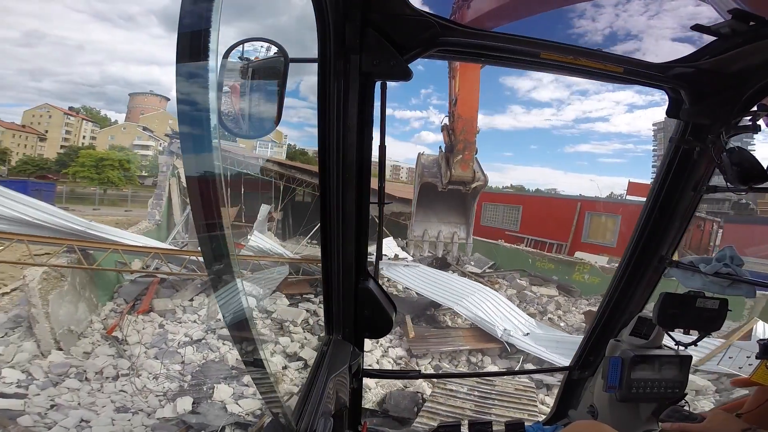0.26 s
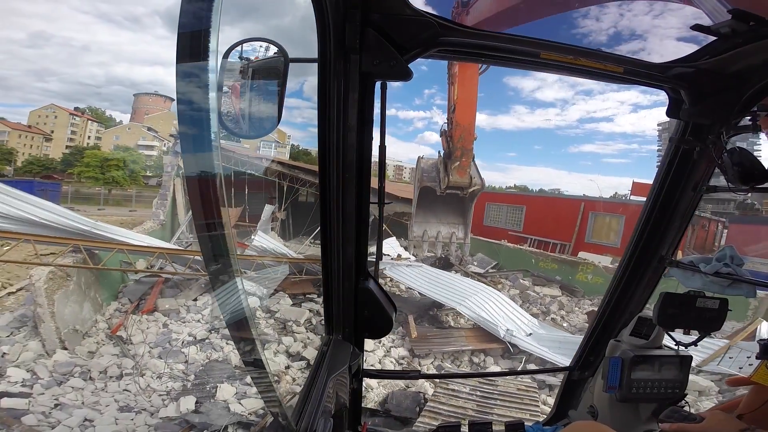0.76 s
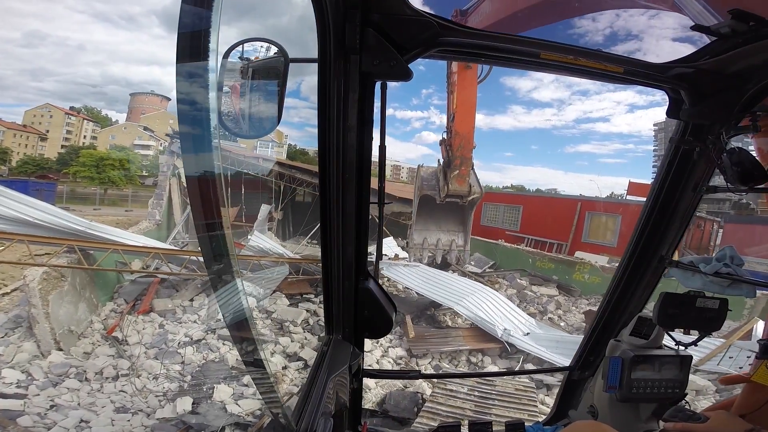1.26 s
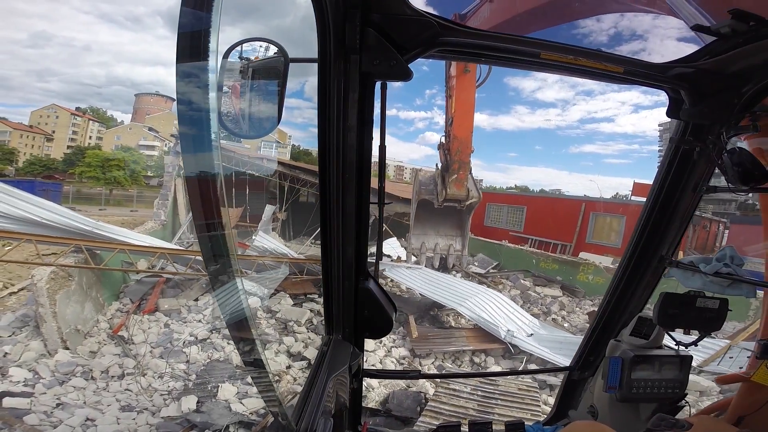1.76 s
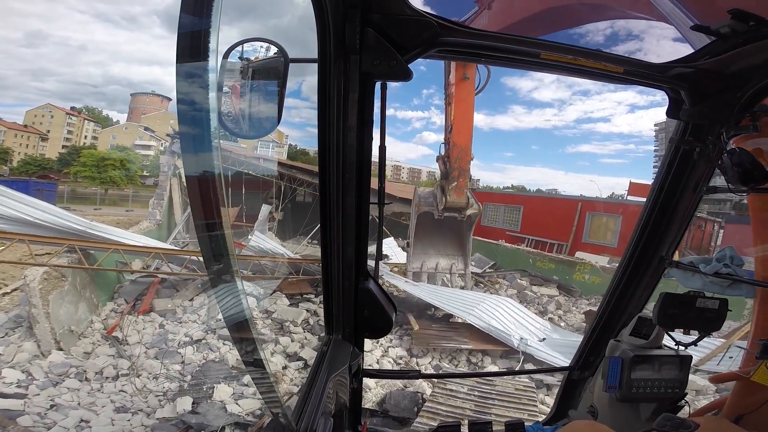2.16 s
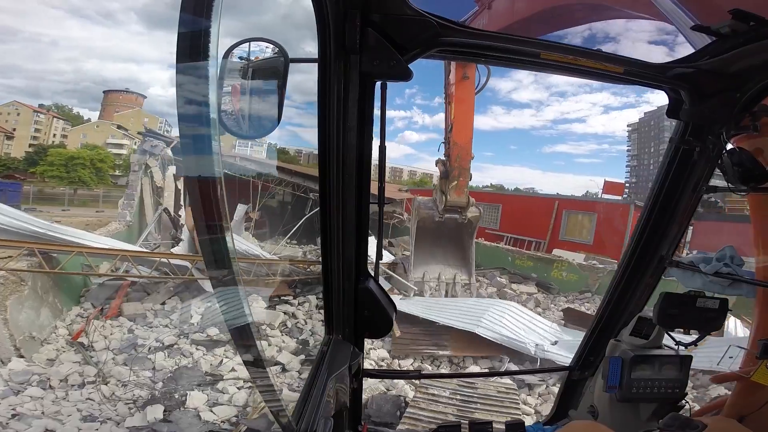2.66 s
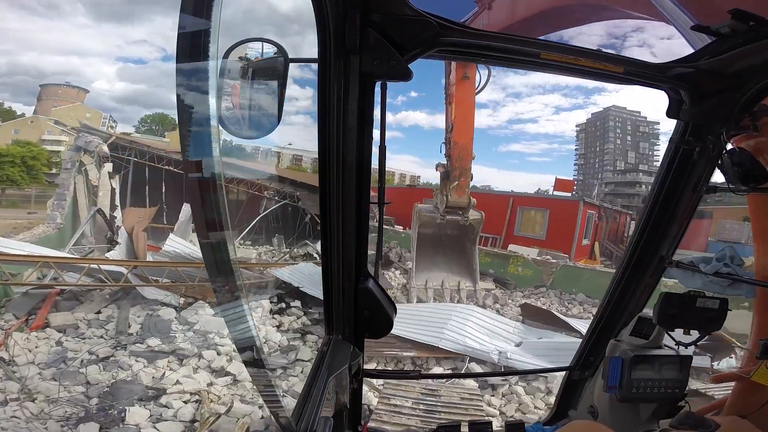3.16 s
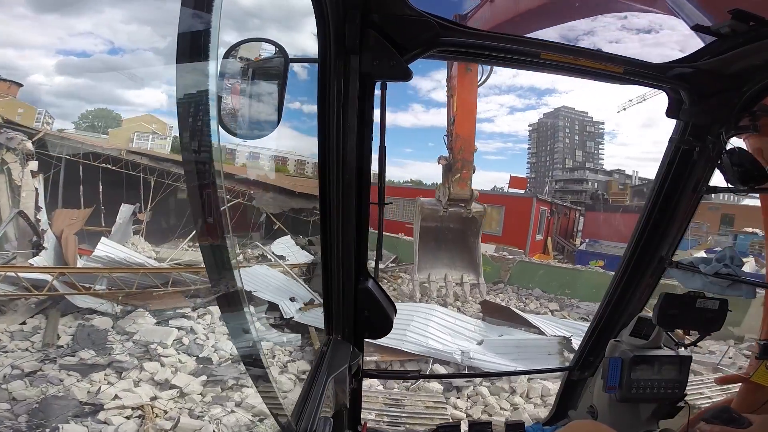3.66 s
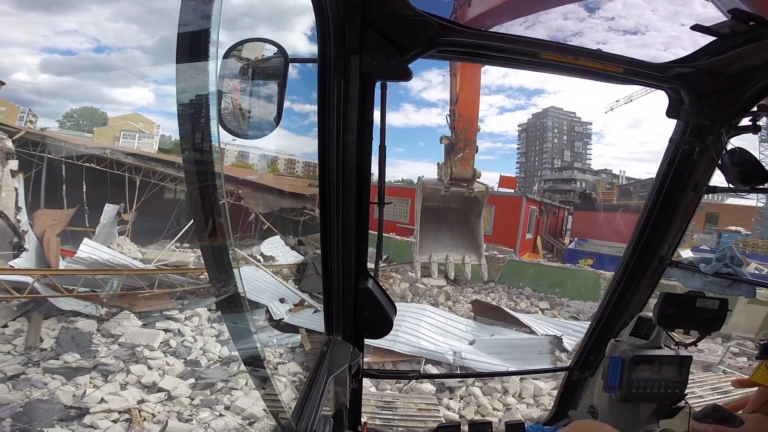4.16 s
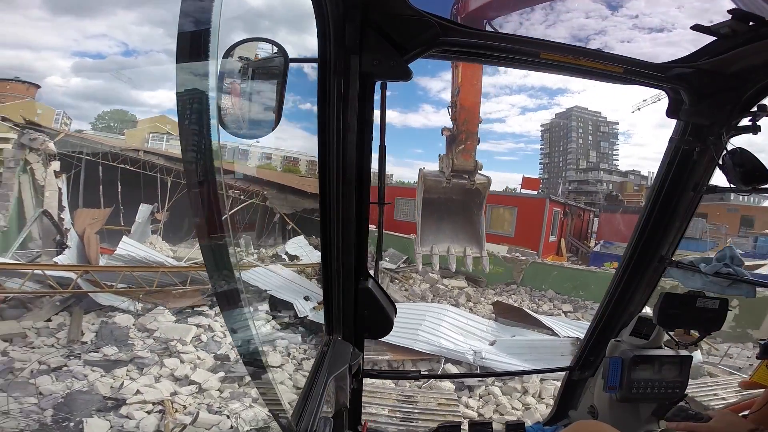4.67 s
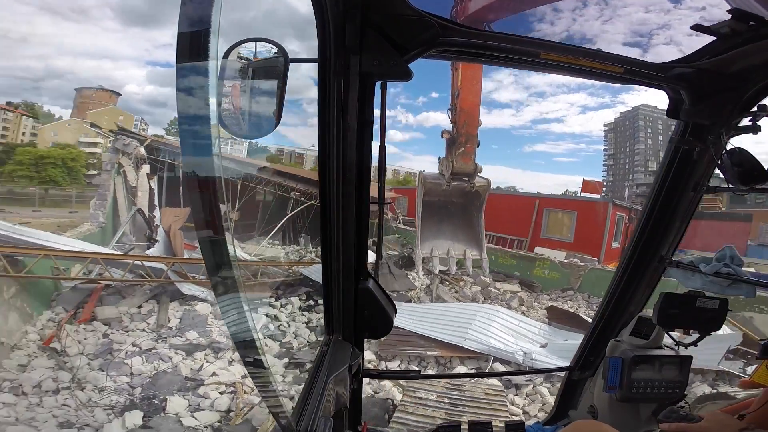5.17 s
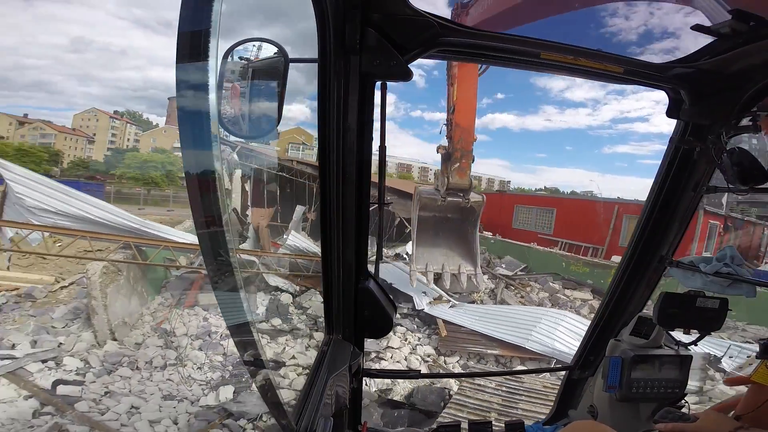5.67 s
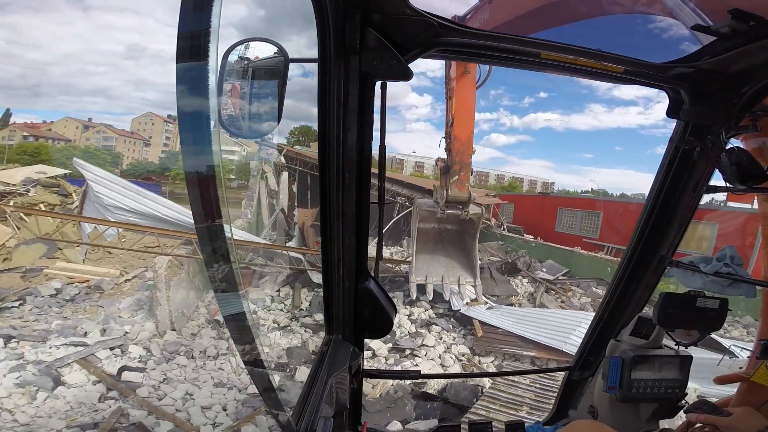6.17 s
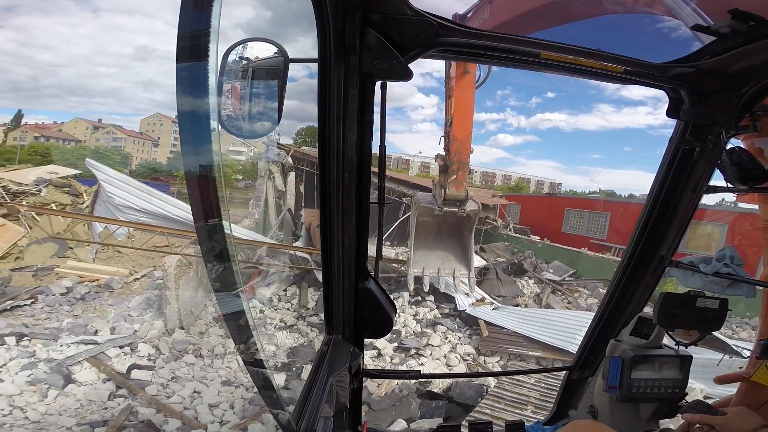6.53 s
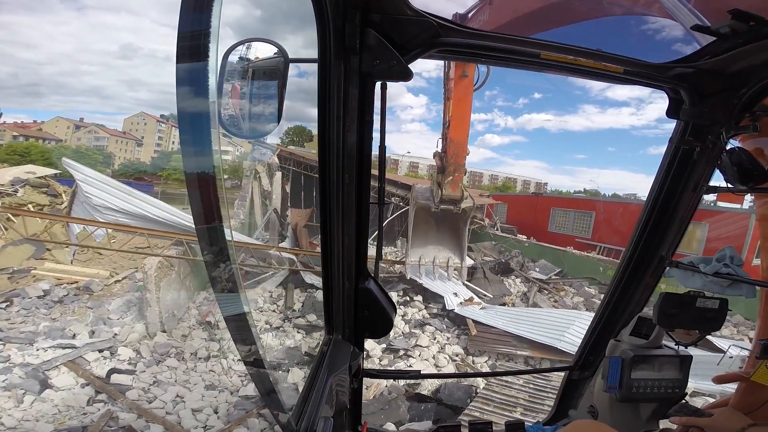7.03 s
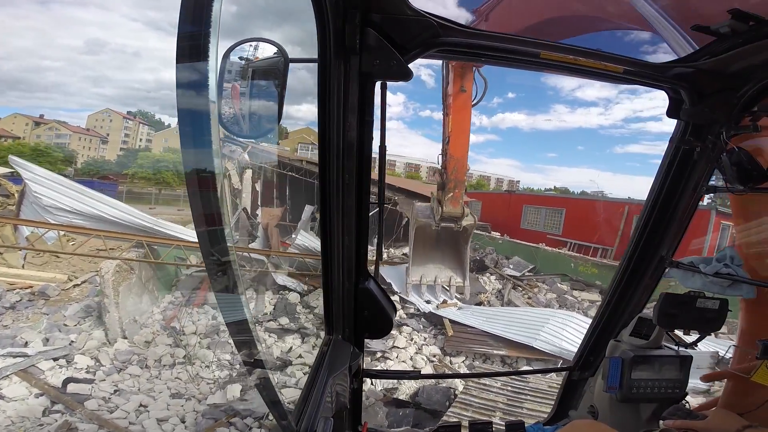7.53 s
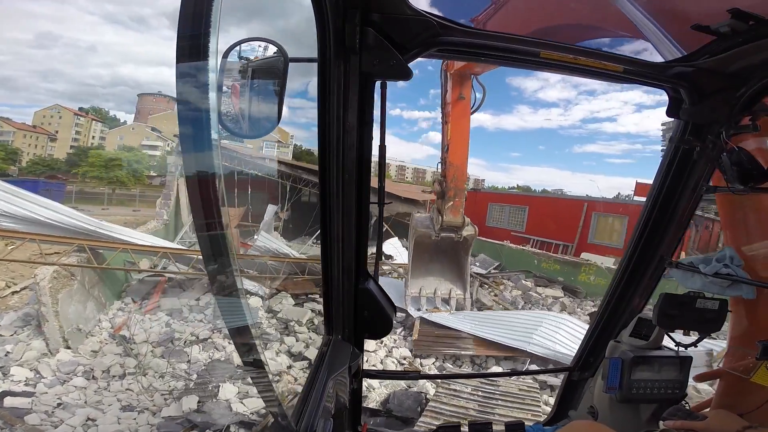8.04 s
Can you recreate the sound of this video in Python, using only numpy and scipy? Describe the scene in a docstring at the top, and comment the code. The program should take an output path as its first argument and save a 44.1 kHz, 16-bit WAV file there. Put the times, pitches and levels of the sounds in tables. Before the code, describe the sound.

A bass-heavy diesel drone fills a small glass-walled cab, its boom constantly rising and falling, with a steady pump hum. A microphone inside catches muffled bucket thuds, dry steel clanks, rattling panels and tiny grit ticks. Valves spit, rush and whistle faintly as the arm sweeps rubble. The hardest clank comes early, drumming thuds follow mid-way, then a short gritty scrape of sheet metal and more knocks near the end.

```python
"""Inside the closed cab of a diesel excavator that sweeps sheet metal.
From the start engine orders boom, a pump hums, jolts shake the cab; oil and fan noise hiss, valves whistle,
grit ticks. From 0.27 s the bucket knocks: steel modes clank, thuds come dulled through rubber mounts.
Near 1.55 s a tink leads the hardest clank, with gritty noise bursts at its onset and a drumming panel;
from 1.76 s valves spit noise. Near 6.94 s a gritty burst opens the scrape of the teeth, which rings the sheet."""
import sys
import numpy as np
from scipy import signal
from scipy.fft import rfft, irfft
from scipy.io import wavfile
from scipy.ndimage import uniform_filter1d, minimum_filter1d

SR = 44100
rng = np.random.default_rng(int(sys.argv[2]) if len(sys.argv) > 2 else 0)


def dump(signal):
    """Clip the signal to [-1, 1] and save it as 16-bit WAV at the path in sys.argv[1]."""
    limited = np.clip(np.atleast_2d(signal).T, -1, 1)
    pcm = np.round(limited * 32767).astype(np.int16)
    wavfile.write(sys.argv[1], SR, pcm)


N = 366030
TIME = np.arange(N) / SR


def amp(db):
    """Amplitude of a level in dB."""
    return 10 ** (np.asarray(db) / 20)


def unit(x):
    """Scales to rms 1."""
    return x / np.sqrt(np.mean(x ** 2) + 1e-20)


def noise():
    """White noise over the whole scene."""
    return rng.standard_normal(N)


def curves(rows):
    """Each column of a table, interpolated over time."""
    start_s, *columns = np.transpose(rows)
    return [np.interp(TIME, start_s, column) for column in columns]


def colour(x, points, peaks=()):
    """Filters by a smooth spectrum with narrow resonances on top; rms 1."""
    hz = np.fft.rfftfreq(N, 1 / SR)
    point_hz, point_db = np.transpose(points)
    shape_db = np.interp(np.log(hz + 1), np.log(point_hz), point_db)
    # steep skirts outside the listed range
    shape_db = shape_db - 40 * np.maximum(np.log(point_hz[0] / (hz + 1)), 0)
    shape_db = shape_db - 40 * np.maximum(np.log((hz + 1) / point_hz[-1]), 0)
    for centre_hz, width_hz, lift_db in peaks:
        shape_db = shape_db + lift_db / (1 + (2 * (hz - centre_hz) / width_hz) ** 2)
    return unit(irfft(rfft(x) * amp(shape_db), N))


def wander(rate_hz):
    """Random control of rms 1 that rolls off above the rate."""
    hz = np.fft.rfftfreq(N, 1 / SR)
    hz = hz[:np.searchsorted(hz, 2000)]
    chance = rng.standard_normal(len(hz)) + 1j * rng.standard_normal(len(hz))
    return unit(irfft(chance / (1 + (hz / rate_hz) ** 4), N))


def held(start_s, length_s, rise_s, fade_s):
    """Envelope that rises from the start, holds until the length is over and decays exponentially."""
    age_s = TIME - start_s
    return np.clip(age_s / rise_s, 0, 1) * np.exp(-np.maximum(age_s - length_s, 0) / fade_s)


def steadied(x, size):
    """Evens out swells that last longer than size samples."""
    power = uniform_filter1d(uniform_filter1d(x ** 2, size), size)
    return x / np.sqrt(power + 1e-6)


def add(mix, start_s, sound):
    """Mixes a sound in at its start time."""
    part = mix[max(round(start_s * SR), 0):][:len(sound)]
    part += sound[:len(part)]


def order_tone(turns, multiple, rough, waver_hz):
    """One order of a rotation, uneven in strength and timing; rms 1."""
    phase = 2 * np.pi * (multiple * turns + rng.random())
    in_phase = (1 + rough * wander(waver_hz)) * np.cos(phase)
    return unit(in_phase + rough * wander(waver_hz) * np.sin(phase))


def shifting(x, depth_db, width_hz, rate_hz):
    """Short-lived resonances come and go at random pitches; rms 1."""
    hz, t, z = signal.stft(x, SR, nperseg=512, noverlap=384)
    field = rng.standard_normal((len(t), len(hz))).T
    across = np.fft.fftfreq(len(hz), hz[1])[:, None]
    along = np.fft.fftfreq(len(t), t[1])
    smoothing = np.exp(-(across * width_hz) ** 2 - (along / rate_hz) ** 2)
    patches = unit(np.fft.ifft2(np.fft.fft2(field) * smoothing).real)
    shifted = signal.istft(z * amp(depth_db * patches), SR, nperseg=512, noverlap=384)[1]
    return unit(shifted[:N])


def ring(modes, clatter_s, tilt_db=0, spread=0.03, sag=0):
    """A noisy blow rings modes that start flat by the share sag and rise as the contact tightens.

    tilt_db is per octave; spread is each mode's random detuning; the loudest 10 ms have rms 1.
    """
    t = np.arange(SR // 2) / SR
    blow = rng.standard_normal(len(t)) * np.exp(-t / clatter_s)
    rise_s = 0.011
    stretched = t - sag * rise_s * (1 - np.exp(-t / rise_s))
    sound = np.zeros(len(t))
    for hz, level_db, t60_s in modes:
        detuned_hz = hz * (1 + spread * (2 * rng.random() - 1))
        swell = 1 - np.exp(-hz * t)  # a mode needs about a cycle to build up
        mode = np.sin(2 * np.pi * detuned_hz * stretched) * swell * amp(-60 * t / t60_s)
        rung = signal.fftconvolve(blow, mode)[:len(t)]
        sound += amp(level_db + tilt_db * np.log2(hz / modes[0][0])) * rung / abs(rung).max()
    return sound / np.sqrt(uniform_filter1d(sound ** 2, size=441).max())


# crankshaft speed: time_s, turns_per_s
CRANK_SPEED = [(0.0, 27.7), (0.95, 27.9), (1.3, 27.6), (1.6, 27.8), (2.7, 27.55), (3.3, 27.75), (4.0, 27.6),
               (4.75, 27.8), (5.4, 27.7), (6.55, 27.5), (7.6, 27.7), (8.29, 27.6)]


def crankshaft():
    """Turns made so far: the integral of the speed."""
    return np.cumsum(curves(CRANK_SPEED)[0]) / SR


# boom at the firing rate: time_s, level_db
FIRING_BOOM = [(0.0, -13.5), (0.14, -10), (0.24, -17.5), (0.44, -10.5), (0.72, -22), (0.88, -42),
               (1.02, -23.5), (1.14, -33), (1.24, -26.5), (1.4, -29.5), (1.62, -29.5), (1.95, -42),
               (2.1, -25.5), (2.62, -19.5), (2.68, -20.5), (2.75, -10.5), (2.92, -15.5), (3.05, -18.5),
               (3.28, -20.5), (3.62, -10.5), (3.74, -25.5), (3.94, -10), (4.18, -14.5), (4.31, -28),
               (4.4, -20), (4.86, -18), (4.98, -27), (5.06, -20.5), (5.22, -8), (5.4, -14.5), (5.66, -28.5),
               (5.82, -15.5), (5.94, -20), (6.03, -13.5), (6.15, -21.5), (6.36, -15), (6.46, -31.5),
               (6.57, -25), (6.68, -42), (6.76, -21.5), (6.83, -31), (6.9, -20.5), (7.08, -15.5),
               (7.72, -26), (7.82, -15), (8.06, -33), (8.16, -15), (8.29, -21.5)]
# hum at twice the firing rate: time_s, level_db
DOUBLE_FIRING = [(0.0, -32), (0.28, -29), (0.9, -31.5), (1.1, -29.5), (1.47, -39.5), (1.65, -31.5),
                 (1.9, -33), (2.8, -26.5), (3.4, -33), (4.45, -34.5), (5.2, -30.5), (5.9, -37),
                 (6.12, -26.5), (6.42, -35), (6.6, -32.5), (6.7, -38), (6.85, -27.5), (7.12, -26),
                 (8.29, -29)]
# weak engine orders: multiple_of_crank_speed, level_db
WEAK_ORDERS = [(1, -32.5), (3, -51.5), (3.5, -36), (5, -60), (8, -46.5), (8.5, -47.5), (12, -64.5),
               (16, -67.5)]
THROB_DB, THROB_HZ = 0.56, 15  # rms depth, corner rate


def engine(turns):
    """Two firings a turn boom in the cab, with twice that rate and weak orders of the crankshaft."""
    firing_db = curves(FIRING_BOOM)[0] + THROB_DB * wander(THROB_HZ)
    boom = amp(firing_db) * order_tone(turns, 2, rough=0.1, waver_hz=6)
    double = amp(curves(DOUBLE_FIRING)[0]) * order_tone(turns, 4, rough=0.34, waver_hz=6.2)
    weak = sum(amp(level_db) * order_tone(turns, multiple, rough=0.72, waver_hz=5.8)
               for multiple, level_db in WEAK_ORDERS)
    return boom + double + weak


# fundamental of the pump: time_s, level_db
PUMP_HUM = [(0.0, -38), (0.25, -32), (0.45, -35.5), (0.68, -30.5), (0.9, -42.5), (1.07, -49), (1.34, -38.5),
            (1.55, -41), (1.8, -47), (2.05, -39), (2.45, -33.5), (2.62, -34.5), (2.73, -53), (2.86, -36.5),
            (3.3, -38.5), (3.76, -42.5), (3.94, -53), (4.24, -50.5), (4.38, -34), (4.7, -33.5), (5.05, -33),
            (5.25, -28.5), (5.5, -32), (5.85, -40), (6.3, -54.5), (6.4, -41), (6.5, -32), (6.74, -42.5),
            (7.16, -34.5), (7.55, -42.5), (7.86, -44.5), (8.29, -36)]
# overtones of the pump: time_s, second_harmonic_db, third_harmonic_db
PUMP_HARMONICS = [(0.0, -61.5, -67), (0.6, -60, -61.5), (0.95, -56, -71), (1.5, -56, -70), (1.85, -66, -74),
                  (2.35, -63, -66), (2.9, -59.5, -59), (4.1, -64, -53.5), (4.5, -63.5, -62.5),
                  (6.25, -67, -70.5), (6.55, -59.5, -69), (7.1, -62.5, -60), (8.29, -67, -65.5)]


def pump(turns):
    """Seven piston strokes a turn hum, with two overtones."""
    strokes = 7
    hum = amp(curves(PUMP_HUM)[0]) * order_tone(turns, strokes, rough=0.15, waver_hz=7)
    overtones = sum(amp(level_db) * order_tone(turns, k * strokes, rough=1.0, waver_hz=6.4)
                    for k, level_db in enumerate(curves(PUMP_HARMONICS), 2))
    return hum + overtones


# jolts of the machine: start_s, length_s, floor_db, sway_db, panel_db
CAB_JOLTS = [(-.02, 0.16, -19, -29, -33), (0.19, 0.56, -31, -25, -41), (0.963, 0.067, -27, -21, -54),
             (1.543, 0.039, -36, -27, -38), (1.707, 0.07, -33, -23.5, -52), (2.027, 0.15, -21.5, -22, -36),
             (2.238, 0.43, -36.5, -21.5, -44.5), (2.722, 0.13, -21.5, -25, -33.5),
             (2.874, 0.13, -26.5, -32, -35), (3.114, 0.077, -23, -27.5, -36.5),
             (3.445, 0.082, -22.5, -15.5, -25.5), (3.546, 0.064, -15.5, -21, -32),
             (3.726, 0.09, -20.5, -18.5, -29.5), (4.423, 0.094, -30, -34, -40),
             (4.675, 0.27, -23, -30, -37.5), (5.008, 0.11, -12, -28.5, -31.5),
             (5.185, 0.22, -36.5, -34, -35), (5.513, 0.072, -17, -13.5, -29.5),
             (5.629, 0.078, -26, -16.5, -30.5), (5.76, 0.12, -22.5, -20.5, -33),
             (5.855, 0.14, -16.5, -16.5, -34), (6.078, .24, -23, -28.5, -36.5),
             (6.517, 0.059, -43, -29, -56), (6.83, 0.45, -31.5, -22.5, -42),
             (7.293, 0.15, -21, -25.5, -33.5), (7.512, 0.12, -19, -18.5, -35.5),
             (7.758, 0.23, -20, -19, -34), (8.04, 0.11, -25, -15.5, -36), (8.19, 0.12, -21.5, -12.5, -31)]
JOLT_RISE_S, JOLT_FADE_S = 0.024, 0.081
REST_FLOOR_DB, REST_SWAY_DB, REST_PANEL_DB = -43, -32, -45


def shaking():
    """Levels in dB of floor boom, slow sway and panel rattle: jolts add power to a steady trembling."""
    rest = amp([[REST_FLOOR_DB], [REST_SWAY_DB], [REST_PANEL_DB]])
    power = rest ** 2 * np.ones(N)
    for start_s, length_s, *levels_db in CAB_JOLTS:
        power += np.outer(amp(levels_db), held(start_s, length_s, JOLT_RISE_S, JOLT_FADE_S)) ** 2
    return 10 * np.log10(power)


# slow sway spectrum: pitch_hz, density_db
SWAY_COLOUR = [(8, -22.5), (17, -11.5), (23, 5.5), (27, 0), (32, -7), (38, -1), (44, -10), (52, -12),
               (70, -35.5)]
# floor boom spectrum: pitch_hz, density_db
FLOOR_COLOUR = [(45, -32.5), (60, -11.5), (72, -2), (82, -19), (96, -0.5), (104, -5), (118, -14.5),
                (135, -27.5), (170, -50)]
# panel rattle spectrum: pitch_hz, density_db
PANEL_COLOUR = [(105, -27.5), (130, -2), (150, -4), (175, -7.5), (215, 0), (236, 2), (265, -11),
                (310, -16.5), (380, -22.5), (440, -21), (495, -31), (590, -22), (720, -40.5), (1000, -30),
                (1600, -65.5)]
AIR_MODE_HZ = 97.02


def cab(turns):
    """Random jolts sway the cab and drum its floor; hard shaking rings its air; panels buzz with the firing."""
    floor_db, sway_db, panel_db = shaking()
    jolts = rng.standard_normal((3, N)) * (rng.random((3, N)) < 2000 / SR)  # 2000 impulses per s
    buzz = 1 + .3 * np.cos(2 * np.pi * 2 * turns)
    sway = amp(sway_db) * steadied(colour(jolts[0], SWAY_COLOUR), size=12000)
    drum = steadied(colour(jolts[1], FLOOR_COLOUR), size=2500)
    drone = order_tone(AIR_MODE_HZ * TIME, 1, rough=0.42, waver_hz=6.0)
    ringing = np.clip((floor_db + 26) / 11, 0, .88)  # drone's share of the floor power
    floor = amp(floor_db) * (np.sqrt(ringing) * drone + np.sqrt(1 - ringing) * drum)
    panels = amp(panel_db) * steadied(colour(jolts[2] * buzz, PANEL_COLOUR), size=2500)
    return sway + floor + panels


# control strokes: start_s, length_s, level_db, brightness_db (added to the bright half, taken off the dull)
OIL_STROKES = [(-.05, 0.55, -57, -3), (2.003, 0.087, -50, -2), (2.175, 0.23, -46, -2),
               (2.537, 0.72, -45.5, 0), (3.339, 0.16, -43, 1.5), (3.596, 0.067, -52.5, -6.5),
               (3.89, 0.11, -46.5, 1.5), (4.074, 0.28, -48, -3), (4.446, 0.35, -56, 0.5),
               (5.412, 0.35, -55, 2.5), (5.662, 0.28, -53, 3), (6.77, 0.28, -57, 3),
               (6.975, 0.15, -49.5, -2), (7.274, .34, -49, -3), (7.671, 0.5, -46, -0.5),
               (8.205, .1, -55, 1)]
STROKE_RISE_S, STROKE_FADE_S, IDLE_FLOW_DB = 0.04, 0.14, -61


def flow(side):
    """Amplitude of the oil's flow: strokes add power to idle circulation; side weighs their brightness."""
    power = amp(IDLE_FLOW_DB) ** 2
    for start_s, length_s, level_db, brightness_db in OIL_STROKES:
        opening = held(start_s, length_s, STROKE_RISE_S, STROKE_FADE_S)
        power = power + (amp(level_db + side * brightness_db) * opening) ** 2
    return np.sqrt(power)


# rush spectrum: pitch_hz, density_db
RUSH_COLOUR = [(250, -11.5), (420, 1.5), (600, -2), (740, -10.5), (980, 3), (1220, -3), (1700, -1.5),
               (2800, -1.5), (3800, -3.5), (4500, -8.5), (5100, -18.5), (6000, -11.5), (8000, -31),
               (14000, -47)]
# cab resonances on all hiss: pitch_hz, width_hz, lift_db
CAB_PEAKS = [(586, 55, 0.5), (940, 160, 4.5), (1555, 300, 4), (1854, 42, 4.5), (2328, 180, 4.5),
             (2740, 120, 5.5), (3260, 90, 3.5), (4000, 64, -5), (4500, 100, 3), (6060, 220, 3.5)]


def oil_rush(turns):
    """Turbulent oil rushes in the lines with each stroke, rippling slightly with the firing."""
    ripple = 1 + 0.036 * np.cos(2 * np.pi * 2 * turns)
    turbulence = colour(noise() * ripple * amp(1.0 * wander(45)), RUSH_COLOUR, CAB_PEAKS)
    rush = shifting(turbulence, depth_db=1.5, width_hz=660, rate_hz=23)
    dull = signal.sosfiltfilt(signal.butter(2, 1800, fs=SR, output="sos"), rush)
    return flow(-1) * dull + amp(-1.0) * flow(0.86) * (rush - dull)


# high hiss at the valves: time_s, level_db
VALVE_LEVEL = [(0.0, -56), (0.42, -58), (0.88, -63.5), (2.18, -62), (3.3, -66), (3.62, -69), (3.84, -60.5),
               (5.36, -63.5), (5.54, -60.5), (6.0, -57.5), (6.28, -69.5), (6.9, -58), (7.4, -65),
               (8.29, -59.5)]
# valve hiss spectrum: pitch_hz, density_db
VALVE_COLOUR = [(1200, -19.5), (2500, -5), (3900, 0), (4550, -1), (5050, -15.5), (5600, 1), (6100, -3),
                (6600, -7), (8000, -14.5), (10000, -25.5), (14000, -38.5)]


def valve_hiss():
    """Oil hisses at the valves: high noise with a flickering level."""
    hiss = colour(noise() * amp(3.0 * wander(60)), VALVE_COLOUR, CAB_PEAKS)
    return amp(curves(VALVE_LEVEL)[0]) * hiss


# fan spectrum: pitch_hz, density_db
FAN_COLOUR = [(150, -7.5), (380, 8), (490, -2), (590, 1.5), (740, -7.5), (980, -11), (1250, -8.5),
              (3000, -11.5), (5000, -17.5), (8000, -29), (10500, -25.5), (12500, -30.5), (15500, -48)]


def fan():
    """The cooling fan moves steady air: coloured noise."""
    return amp(-55.0) * colour(noise(), FAN_COLOUR, CAB_PEAKS)


def reflected(x, count=24):
    """The glass walls send back early reflections that ripple the spectrum."""
    delay, sign = rng.random((count, 2)).T
    taps = np.zeros(SR // 20)
    taps[0] = 1
    places = (len(taps) * (.04 + .95 * delay)).astype(int)
    taps[places] = np.sign(sign - .5) * amp(-17 - 12 * delay)
    return signal.oaconvolve(x, taps / np.linalg.norm(taps))[:N]


# part-open valves: start_s, length_s, pitch_hz, peak_db
VALVE_WHISTLES = [(0.0, 0.49, 6120, -64.5), (0.1, 0.65, 4490, -62), (0.55, 0.23, 362, -47.5),
                  (2.685, 0.065, 4000, -47), (2.965, 0.05, 3310, -50), (5.4, .16, 4500, -62),
                  (5.378, 0.58, 6100, -66.5), (5.677, .38, 3290, -58), (5.78, .28, 2194, -56.5),
                  (6.35, .8, 4480, -73), (6.861, 0.22, 317, -44), (7.86, 0.18, 3480, -56)]


def whistles():
    """Oil through a narrow gap sings a fuzzy tone that swells and fades."""
    out = np.zeros(N)
    for start_s, length_s, pitch_hz, peak_db in VALVE_WHISTLES:
        t = np.arange(int(length_s * SR)) / SR
        # phase random walk: a line 22 Hz wide
        drift = np.cumsum(rng.standard_normal(len(t))) * np.sqrt(2 * np.pi * 22 / SR)
        tone = np.sin(2 * np.pi * pitch_hz * t + drift)
        add(out, start_s, amp(peak_db) * tone * signal.windows.tukey(len(t), .7))
    return out


# metal spots struck by grit: pitch_hz, level_db, t60_s
GRIT_SPOTS = [(900, -13, 0.027), (1510, -5, 0.016), (1834, -3.5, 0.02), (2330, -1.5, 0.033),
              (2740, 1, .025), (3220, -4, 0.013), (3560, -2.5, 0.016), (4000, -4, 0.015)]
GRIT_PER_S, GRIT_SPREAD_DB, GRIT_DB = 500, 3, -8.5  # GRIT_DB is against the oil flow


def grit():
    """Small stones skitter over the metal, each ringing one spot; louder as the bucket moves."""
    chance, size, spot = rng.random((3, N))
    size_db = GRIT_SPREAD_DB * np.minimum(-np.log(1 - size), 3.5)
    hits = (chance < GRIT_PER_S / SR) * amp(size_db)
    spots = GRIT_SPOTS * 3  # three detuned copies of each
    which = (spot * len(spots)).astype(int)
    t = np.arange(SR // 20) / SR
    out = np.zeros(N)
    for k, (pitch_hz, level_db, t60_s) in enumerate(spots):
        detuned_hz = pitch_hz * (1 + .07 * (2 * rng.random() - 1))
        tick = amp(level_db - 60 * t / t60_s) * np.sin(2 * np.pi * detuned_hz * t)
        out += signal.oaconvolve(hits * (which == k), tick)[:N]
    return amp(GRIT_DB) * flow(0) * unit(out)


# thin electrical whine: pitch_hz, level_db
WHINE_TONES = [(8781, -79.5), (11688, -94), (11718, -93), (14625, -95)]


def whine():
    """Steady electrical sines."""
    return sum(amp(level_db) * unit(np.sin(2 * np.pi * pitch_hz * TIME)) for pitch_hz, level_db in WHINE_TONES)


# bucket and linkage: start_s, clank_db, thud_before_mounts_db, brightness_db_per_octave, clatter_s
BUCKET_KNOCKS = [(0.271, -42, -26, -12, 0.0042), (1.566, -34.5, -22, 8, 0.0014),
                 (1.576, -39.5, -42, -15, 0.0033), (2.039, -61, -20.5, -3, 0.025),
                 (2.914, -37, -38, -15, 0.0018), (3.427, -37.5, -18, 0, 0.0085),
                 (3.439, -40.5, -17.5, -18, 0.011), (3.469, -44, -25, 10, 0.0046),
                 (3.489, -41, -20.5, -8, 0.011), (3.818, -46, -23.5, -4, 0.009),
                 (5.528, -42.5, -13, -3, 0.005), (5.566, -40, -21.5, -8, 0.008),
                 (5.918, -45, -40.5, -14.5, .0041), (6.068, -49, -21.5, -12, 0.0021),
                 (6.274, -45.5, -25.5, -6, 0.0045), (7.351, -38, -16, -15, 0.0042),
                 (7.568, -47, -36, 8, .004), (7.788, -42, -33, 6, .004), (7.964, -45, -34, -16, 0.005)]
# steel modes: pitch_hz, level_db, t60_s
STEEL_MODES = [(564, -11.5, 0.058), (790, -12, 0.018), (934, -2, 0.06), (984, 3, .08), (1028, -8.5, 0.31),
               (1043, 1, 0.07), (1335, -7, 0.12), (1710, -10.5, .06), (2280, -20, 0.07),
               (2600, -17.5, 0.044), (2830, -21, 0.041), (3380, -28.5, .04)]
# cab thud modes: pitch_hz, level_db, t60_s
THUD_MODES = [(74.6, 4, 0.52), (95, 0, 0.047), (134, -13, 0.48), (220, -6, 0.12), (242.8, -7, 0.14)]


def knocks():
    """Each knock clanks in the steel and comes down the boom as a thud, lowpassed by rubber mounts."""
    clanks, thuds = np.zeros((2, N))
    for start_s, clank_db, thud_db, brightness_db, clatter_s in BUCKET_KNOCKS:
        add(clanks, start_s, amp(clank_db) * ring(STEEL_MODES, clatter_s, brightness_db, sag=0.0361))
        add(thuds, start_s - .008, amp(thud_db) * ring(THUD_MODES, clatter_s, spread=0.058))
    mounts = signal.butter(4, 265, fs=SR, output="sos")
    return clanks + signal.sosfilt(mounts, thuds)


# light tink just before the hardest clank: start_s, level_db
METAL_TINKS = [(1.547, -49.5)]
# tink modes: pitch_hz, level_db, t60_s
TINK_MODES = [(2800, 6, 0.046), (1740, -5, .05)]


def tinks():
    """Light metal rings two high modes."""
    out = np.zeros(N)
    for start_s, level_db in METAL_TINKS:
        add(out, start_s, amp(level_db) * ring(TINK_MODES, clatter_s=.003))
    return out


# blows on a large panel: start_s, level_db, shaking_s
PANEL_BLOWS = [(1.561, -26, 0.0045), (3.507, -19, 0.0065), (5.532, -22.5, .006), (5.568, -19.5, .005)]
# large panel modes: pitch_hz, level_db, t60_s
DRUM_MODES = [(235, 4, 0.19), (219.7, -2, 0.21), (337, -19, .07), (438, -20.5, 0.21)]


def panel():
    """A large panel of the cab drums after the hardest blows."""
    out = np.zeros(N)
    for start_s, level_db, shaking_s in PANEL_BLOWS:
        add(out, start_s, amp(level_db) * ring(DRUM_MODES, shaking_s, spread=.015))
    return out


# noise bursts at the onset of the hardest clank and of the scrape: start_s, level_db, decay_s
KNOCK_CRACKS = [(1.563, -43, .004), (1.572, -42, 0.0067), (1.596, -51, .008), (6.938, -50, .03)]
# crack spectrum: pitch_hz, density_db
CRACK_COLOUR = [(400, -4), (720, -14), (920, 2), (1400, 4), (1700, 2), (2000, -4), (2400, 5), (3000, -5.5),
                (4500, -12.5), (7000, -34)]


def cracks():
    """Short gritty noise bursts roughen the onset of the hardest clank and of the scrape."""
    level = sum(amp(level_db) * held(start_s, 0, .001, decay_s)
                for start_s, level_db, decay_s in KNOCK_CRACKS)
    return level * colour(noise() * amp(2.7 * wander(500)), CRACK_COLOUR)


# valve openings: start_s, spit_db, surge_db, decay_s
VALVE_SPURTS = [(1.757, -59.5, -74, .038), (1.89, -64, -62, 0.095), (2.35, -63, -46, 0.045),
                (2.574, -61, -48, 0.02), (2.62, -59, -44, 0.055), (2.694, -57, -38, 0.048),
                (2.98, -59, -43, 0.042), (3.082, -55.5, -40.5, 0.061), (3.15, -68, -44, 0.096),
                (3.263, -60, -68, .045), (3.375, -56, -44, 0.039), (3.81, -63.5, -64.5, 0.036),
                (4.75, -60, -61, 0.054), (6.02, -58.5, -75, 0.034), (6.11, -62, -55, 0.047),
                (7.46, -77, -47.5, 0.089), (7.805, -59, -46, 0.059), (8.09, -62, -45.5, 0.051)]
# spit spectrum: pitch_hz, density_db
SPIT_COLOUR = [(1500, -8), (2800, -6), (4200, 14.5), (5100, 0.5), (6000, 10.5), (7300, 2.5), (8500, -8),
               (9900, 3), (11500, -6.5), (13500, -12.5), (15500, -25)]
# surge spectrum: pitch_hz, density_db
SURGE_COLOUR = [(500, -16), (1000, -8), (1700, -3), (2300, -1), (2900, 1), (3900, 0.5), (4600, -8),
                (5100, -12), (6000, -8.5), (8000, -26), (14000, -45)]


def spurts():
    """A valve cracking open spits and surges: noise snaps on and dies as the pressure evens out."""
    levels = np.zeros((2, N))
    for start_s, spit_db, surge_db, decay_s in VALVE_SPURTS:
        age_s = np.maximum(TIME - start_s, 0)
        envelope = (1 - np.exp(-age_s / 0.00053)) * np.exp(-(age_s / decay_s) ** 2)
        levels += np.outer(amp([spit_db, surge_db]), envelope)
    spit = colour(noise() * amp(2.2 * wander(250)), SPIT_COLOUR, CAB_PEAKS)
    surge = shifting(colour(noise(), SURGE_COLOUR, CAB_PEAKS), depth_db=2.0, width_hz=400, rate_hz=22)
    return levels[0] * spit + levels[1] * surge


# teeth on the sheet metal: start_s, level_db, decay_s
TEETH_SCRAPES = [(6.94, -39, 0.026), (6.957, -41.5, 0.014), (6.971, -45, 0.013)]
# sheet modes: pitch_hz, level_db, t60_s
SHEET_MODES = [(470, -7, 0.042), (586, -3, 0.039), (970, 2.5, 0.09), (1220, -2, 0.029), (1480, -3.5, 0.077),
               (1610, -3, 0.059), (1793, -7, .04), (2240, -12, 0.039), (2890, -12, 0.055)]


def scrapes():
    """The teeth scrape the sheet: decaying noise rings its modes."""
    out = np.zeros(N)
    for start_s, level_db, decay_s in TEETH_SCRAPES:
        add(out, start_s, amp(level_db) * ring(SHEET_MODES, decay_s))
    return out


def scene():
    """Engine, shaking cab, hydraulics and bucket, heard from the seat."""
    turns = crankshaft()
    machine = engine(turns) + pump(turns) + cab(turns)
    hiss = reflected(oil_rush(turns) + valve_hiss() + fan() + spurts())
    blows = knocks() + tinks() + panel() + cracks() + scrapes()
    return (machine + hiss + whistles() + grit() + blows)[None]


def record(dry):
    """Gain eases on the highest peaks; whine joins, both ends fade briefly, a lowpass limits the band."""
    ceiling, edge_hz, fade_s = .76, 15700, .012
    headroom = np.minimum(ceiling / (abs(dry) + 1e-9), 1)
    lowest = minimum_filter1d(headroom, size=1400)
    gain = uniform_filter1d(uniform_filter1d(lowest, size=700), size=700)
    to_end_s = np.minimum(TIME, TIME[-1] - TIME)
    fade = np.sin(np.pi / 2 * np.minimum(to_end_s / fade_s, 1)) ** 2
    lowpass = signal.firwin(511, edge_hz, window=("kaiser", 9), fs=SR)[None]
    return signal.oaconvolve((dry * gain + whine()) * fade, lowpass, "same")


dry = scene()
out = record(dry)
dump(out)
```